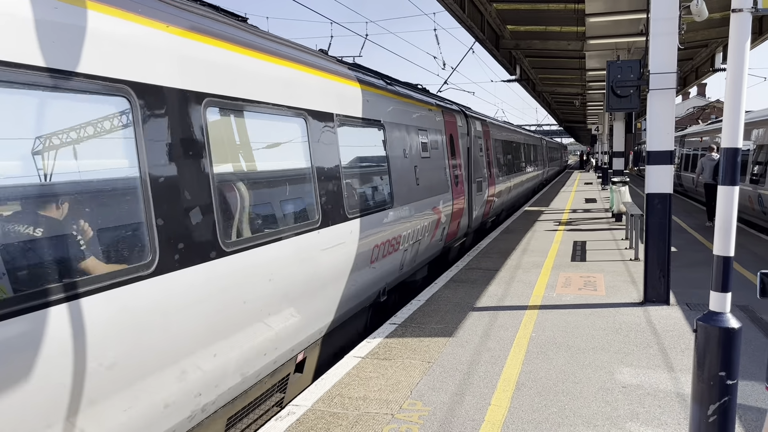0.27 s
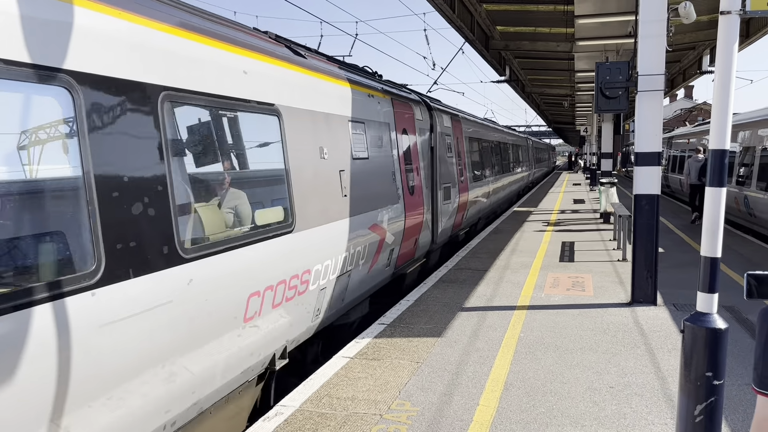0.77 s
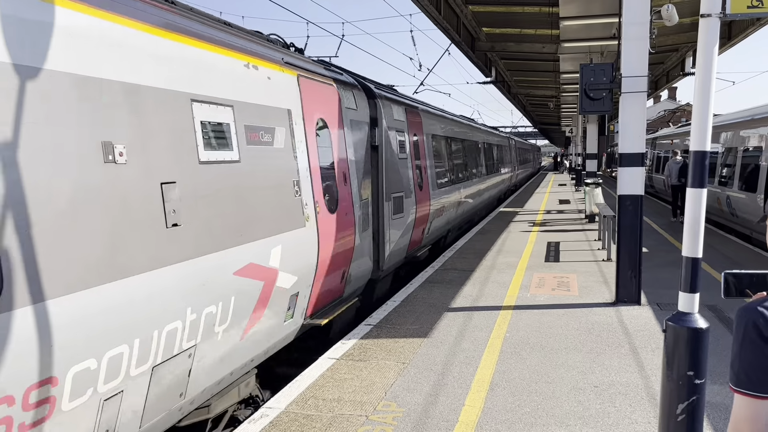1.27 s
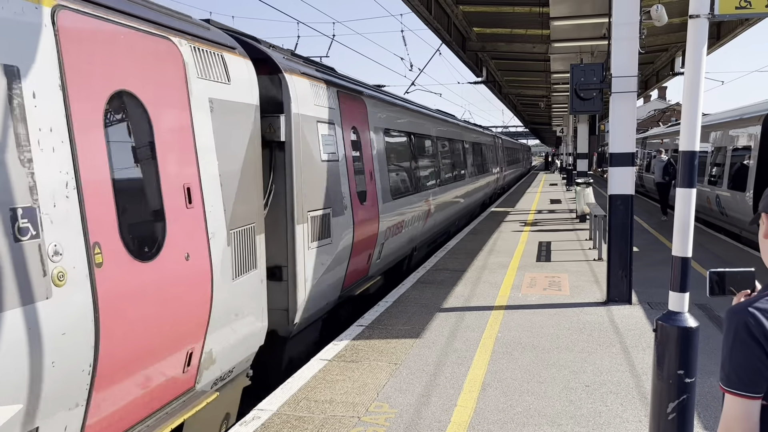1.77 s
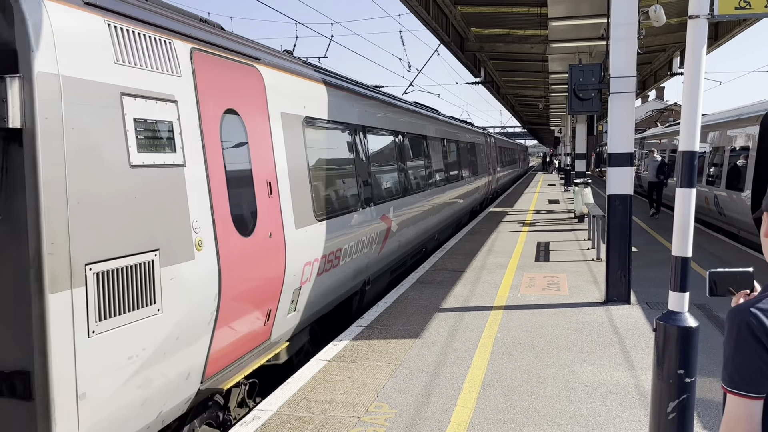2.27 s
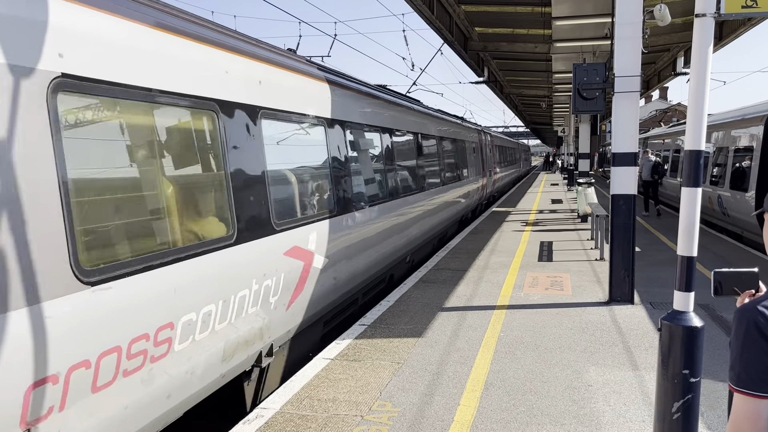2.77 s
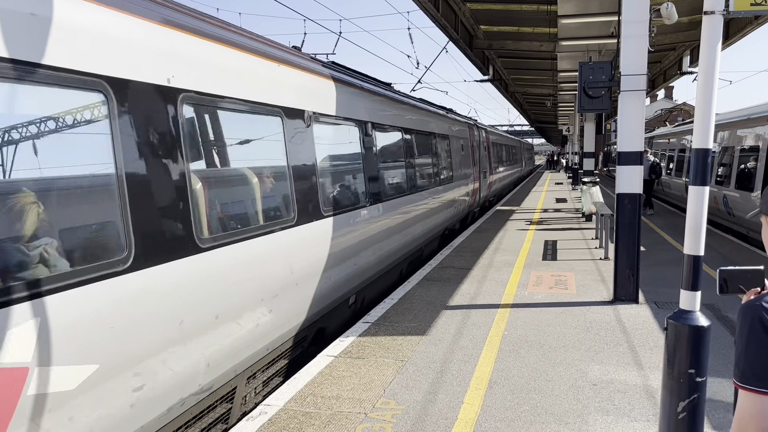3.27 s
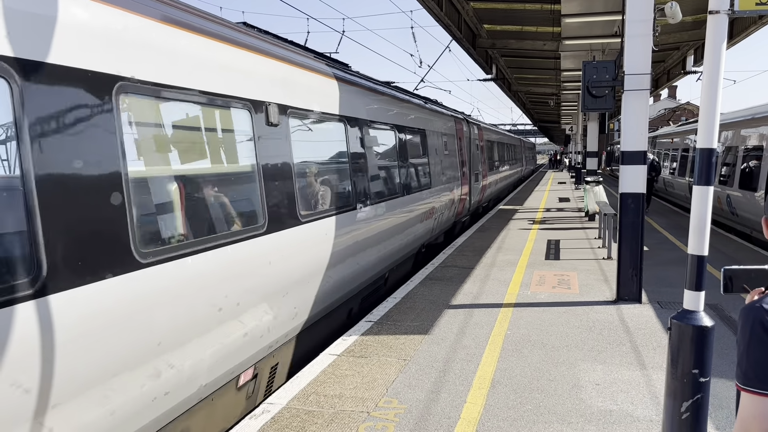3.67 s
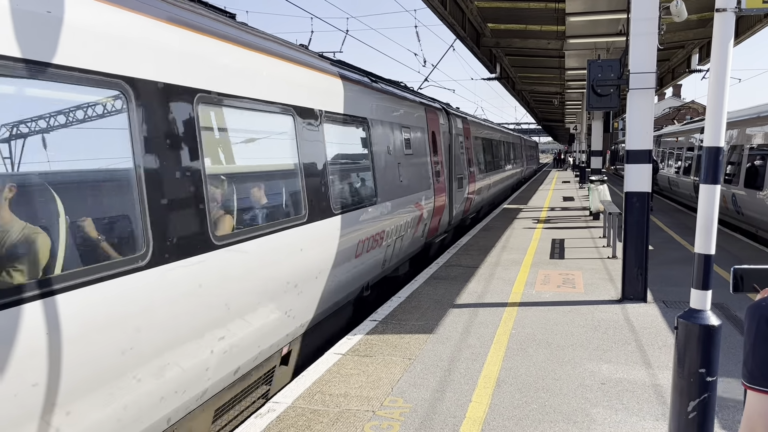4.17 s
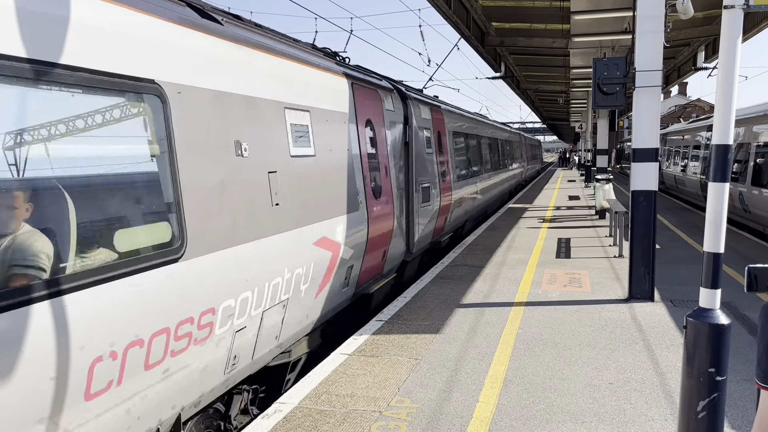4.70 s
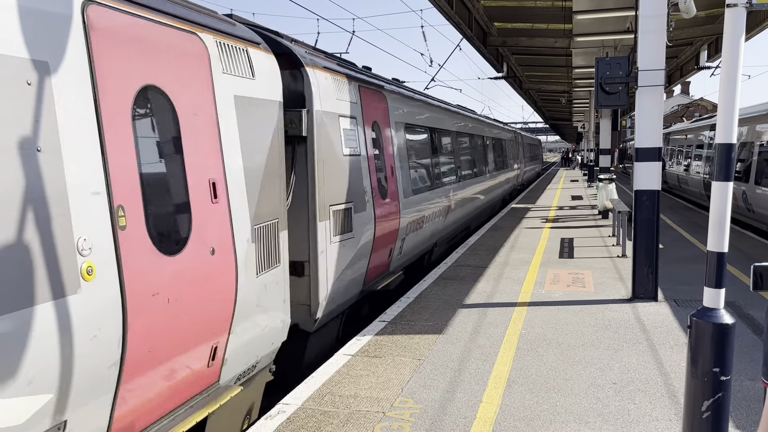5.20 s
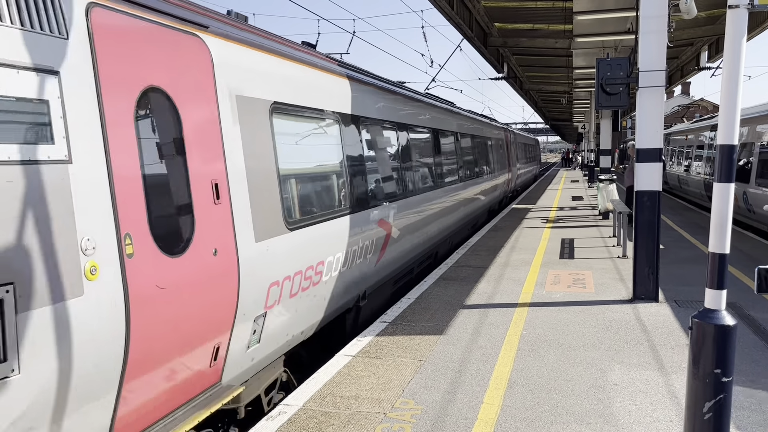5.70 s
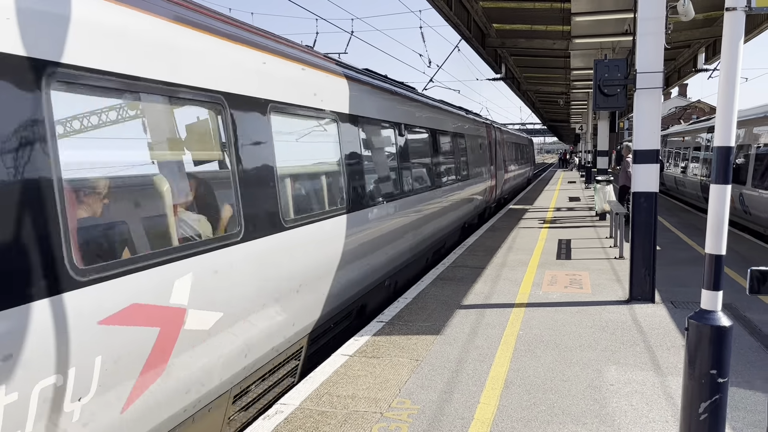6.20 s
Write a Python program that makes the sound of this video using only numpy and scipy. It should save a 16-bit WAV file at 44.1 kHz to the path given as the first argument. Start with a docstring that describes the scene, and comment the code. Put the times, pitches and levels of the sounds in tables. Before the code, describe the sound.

A diesel train pulls away close beside an open station platform. A strong low engine drone swells near the start, fades into a looser throb, then a second engine passes later with wheel roar, mechanical noise and hiss. Breathy turbo whistles climb, strongest in the second half, and a third engine approaches at the end. Fixed stereo microphone at the platform edge, train slightly left.

```python
"""Along a station platform a diesel multiple unit pulls away, its carriages passing close by.
Under the floors six-cylinder engines drone and throb, as sums of wavering tones locked to one crank angle.
Two of them go by and a third draws near, each with swells of wheel roar, casing noise and hiss in coloured noise.
Faint gear whines and broad rushes come and go; breathy turbocharger whistles, narrow noise bands, climb
as the boost builds. A distant engine beats underneath."""
import sys
import numpy as np
from scipy import signal
from scipy.fft import rfft, irfft, next_fast_len
from scipy.io import wavfile
from scipy.ndimage import uniform_filter1d, minimum_filter1d

SR = 44100
rng = np.random.default_rng(int(sys.argv[2]) if len(sys.argv) > 2 else 0)


def store_wav(level_fs):
    """Save 16-bit WAV to argv[1]."""
    pcm = np.round(np.clip(np.atleast_2d(level_fs), -1, 1) * 32767)
    wavfile.write(sys.argv[1], SR, pcm.T.astype(np.int16))


N = 284445
TIME = np.arange(N) / SR

# engine speed, opening up and easing off: [t/s, crank speed/(turns per s)]
CRANK = [(0, 27.5), (1.5, 28.2), (2.25, 28.5), (2.6, 29.35), (2.85, 30.6), (4, 31.1), (5, 30.95),
         (5.8, 29.9), (6.1, 30), (6.45, 29.3)]

# exhausts going by: [t nearest/s, level of firing tone/dB, of its 2nd, 3rd and 4th harmonic/dB]
EXHAUSTS = [(1.0, -14, -9.5, -16, -33), (5.099, -23, -19.5, -31.5, -51)]
# swell of each of those four tones, first to fourth: [t after the pipe is nearest/s, half duration/s, far level/dB]
DRONE_SWELLS = [(-0.64, 1, -29), (-0.029, 0.78, -54.5), (0.13, 0.91, -58.5), (-.1, 0.44, -64)]
# a tone sinks as its echo from the platform cancels it: [t/s, half duration/s, harmonic, depth/dB]
FADES = [(0.094, 0.084, 3, 17), (0.293, 0.093, 2, 18.5), (0.749, 0.19, 2, 14), (1.419, 0.086, 3, 16.5),
         (1.504, 0.09, 1, 6.5), (2.394, 0.33, 1, 14.5), (2.35, .1, 3, 21), (2.952, .12, 2, 30),
         (3.244, 0.27, 1, 14), (3.468, 0.16, 2, 42), (3.3, 0.54, 3, 19), (3.845, 0.39, 1, 7.5),
         (4.32, 0.083, 2, 25), (4.645, 0.23, 1, 13.5), (5.757, .18, 1, 14), (6.35, .25, 2, 4)]
# swells of the throb of unequal cylinders: [t strongest/s, level of deep part/dB, level of upper part/dB]
THROBS = [(.15, -38.5, -35.5), (.9, -55.5, -27.5), (1.7, -29.5, -36.5), (2.45, -37, -33),
          (3.45, -38.5, -58), (4.699, -42, -26.5), (5.17, -24, -31)]
# shape of the deep and the upper swell: [t after that moment/s, half duration/s, far level/dB]
DEEP_SWELL = (0.0, 0.28, -41.5)
UPPER_SWELL = (0.0, 0.26, -35)
# crank orders in the deep and the upper throb: [multiple of crank speed, level/dB]
DEEP_ORDERS = [(4, -4), (4.5, -9), (5, 2.5), (5.5, -13)]
UPPER_ORDERS = [(6.5, -28), (7, -1), (7.5, -23), (8, -0.5), (8.5, -10.5), (10, -15)]
# colour of the turbulent gas, common to both sides: [f/Hz, relative level per Hz/dB]
GAS_MID = [(32, -24), (45, -6.5), (70, -0.5), (110, -10.5), (160, -4.5), (220, 4), (280, -6), (340, -10.5),
           (420, -25)]

# underfloor machinery going by: [t abreast/s, level of wheel roar/dB, of engine casing/dB, of air hiss/dB]
MACHINERY = [(.53, -27, -40, -51.5), (4.42, -29, -44, -53.3), (6.45, -35, -44.5, -53)]
# how roar, casing and hiss swell: [t after the machinery is abreast/s, half duration/s, far level/dB]
ROAR_SWELL = (0.11, 0.83, -48)
CASING_SWELL = (-.03, 0.91, -56.5)
HISS_SWELL = (0.0, 0.61, -90.5)
# colour of the wheels' roar: [f/Hz, relative level per Hz/dB]
ROAR = [(200, 3.5), (300, 4), (360, -1.5), (420, 0), (500, -0.5), (630, -5.5), (800, -5.5), (1000, -9),
        (1300, -10.5), (1600, -24), (2200, -23.5)]
# crank orders radiated by the block: [multiple of crank speed, level against the roar/dB]
BLOCK_ORDERS = [(11, -20.5), (12, -14), (13, -14.5), (15, -15.5), (16, -16.5), (18, -17), (19, -18)]
# slow shaking of the block: [multiple of crank speed, level against the roar at mean speed/dB]
SHAKE_ORDERS = [(1.5, -14), (2, -13.5), (2.5, -22.5)]
# casing and hiss colours, MID common to both sides, SIDE opposed: [f/Hz, relative level per Hz/dB]
CASING_MID = [(1000, -0.5), (1500, 0), (1750, 4.5), (2100, 0), (2500, -0.5), (3000, 0), (4000, -5),
              (5400, -10.5), (7200, -12.5), (8300, -41), (14000, -29.5)]
CASING_SIDE = [(1000, -10), (1500, 8.5), (2100, -3), (3000, -2.5), (4000, -9), (5400, -8.5), (7000, -16),
               (9000, -31.5), (14000, -43.5)]
HISS_MID = [(4000, 0), (7000, -4), (8300, -25), (9300, 7), (11000, 6), (12500, 5.5), (14500, -2.5)]
HISS_SIDE = [(4000, -7.5), (7000, 4.5), (8800, 15), (10000, 6), (11500, -16), (14500, 6)]
# ringing of the casing: [f/Hz, width/Hz, level against the casing noise/dB]
CASING_RING = (1730, 45, -10.5)

# broad rush of passing bogies and vents: [t nearest/s, half duration/s, f/Hz, spread either side/Hz, level/dB]
RUSHES = [(0.0, 0.24, 1150, 297, -38), (.31, .6, 2023, 225, -46), (.9, .45, 820, 79, -44.5),
          (.95, 0.33, 3042, 215, -43.5), (1.1, 0.45, 5700, 347, -53), (3.25, 0.91, 1206, 202.5, -46),
          (3.85, 0.69, 2403, 401, -46), (4.65, 0.27, 3113, 347.7, -44), (4.55, 0.38, 330, 34.8, -35),
          (5.8, 1, 5105, 1012, -49.5), (6.45, 0.54, 1300, 198, -45.5)]
# whines of gears and pumps: [t nearest/s, half duration/s, f/Hz, spread either side/Hz, level/dB]
WHINES = [(.4, .6, 1163, 8, -49), (1.5, .25, 1170, 14, -53), (.3, .35, 2331, 9, -48.5),
          (.8, .5, 2712, 4, -50.5), (1.6, .6, 5440, 40, -64.5), (3.25, .15, 1945, 8, -54),
          (4.41, .08, 1290, 6, -41), (4.6, .7, 1292, 12, -51), (4.3, .65, 1735, 20, -47.5),
          (5.0, .5, 2745, 14, -54.5), (6.05, .2, 2730, 14, -51)]
# turbocharger whistles: [t nearest/s, half duration/s, f then/Hz, climb/(Hz per s), spread either side/Hz,
#                         level/dB, level of the part common to both sides against the opposed core/dB]
WHISTLES = [(0.596, 0.46, 8930, 0.5, 600, -55, -24), (1.398, 0.91, 6000, 289.5, 120, -63, 2),
            (4.377, 0.74, 7590, 310, 110, -44.5, -5), (5.19, 0.68, 7860, 330.5, 118.3, -46.5, -21.5),
            (6.403, 0.27, 8600, 354.5, 150, -36, -19.5)]
# an engine further down the train: [multiple of crank speed, level/dB]
FAR_ORDERS = [(3, -34), (4, -39), (6, -33.5), (9, -36)]

THROB_ANGLE = np.pi / 20  # the strongest cylinder's thump trails the firing pulse, radians of crank
SILENCER_TOP_HZ = 274
PIPE_HZ, PIPE_WIDTH_HZ = 190, 130
GAS_DB, GAS_FOLLOWS = -10, 0.61  # gas level at unit throb gain; share of the throb's swing in dB
EXHAUST_LAG_S, ROAR_LAG_S = 0.00033, 0.00034  # both reach the left side first
ROAR_SCATTER_DB = -5  # scattered part of the roar, opposed between the sides
SHAKE_DB_PER_TURN_PER_S = 2.3  # the block shakes harder at speed
WHISTLE_SKIRT_DB = -9
FAR_TURNS_PER_S, FAR_WANDER_PER_S = 30.9, 0.25
CUTOFF_HZ = 14600


def exhaust(crank):
    """The drone and the throb leave through the pipe, with puffs of gas that grow with the throb."""
    times, deep_db, upper_db = np.transpose(THROBS)
    deep_gain = going_by(times, deep_db, DEEP_SWELL)
    upper_gain = going_by(times, upper_db, UPPER_SWELL)
    tones = pipe(drone(crank) + throb(crank, deep_gain, upper_gain))
    return from_left([tones, tones], EXHAUST_LAG_S) + gas_puffs(crank, upper_gain)


def drone(crank):
    """Three firings a turn give a tone and its overtones, each swelling as a pipe goes by."""
    times, *levels_db = np.transpose(EXHAUSTS)
    total = np.zeros(N)
    for harmonic, (tone_db, swell) in enumerate(zip(levels_db, DRONE_SWELLS), 1):
        gain = going_by(times, tone_db, swell) * fading(harmonic)
        total += gain * partial(crank, 3 * harmonic, waver=.15)
    return total


def fading(harmonic):
    """Gain of one exhaust tone: it sinks into a trough wherever its platform echo cancels it."""
    loss_db = np.zeros(N)
    for trough_s, half_s, which, depth_db in FADES:
        if which == harmonic:
            loss_db += depth_db * np.exp(-np.abs((TIME - trough_s) / half_s) ** 3)
    return from_db(-loss_db)


def throb(crank, deep_gain, upper_gain):
    """Unequal cylinders add a loose thump; the silencer rolls off the top of its upper part."""
    late_crank = crank - THROB_ANGLE
    silencer = signal.butter(8, SILENCER_TOP_HZ, fs=SR, output="sos")
    deep = orders_of(late_crank, DEEP_ORDERS)
    upper = signal.sosfiltfilt(silencer, orders_of(late_crank, UPPER_ORDERS))
    return deep_gain * deep + upper_gain * upper


def pipe(x):
    """The exhaust pipe delays the tones near its resonance, so each thump rings a few cycles."""
    r = np.exp(-np.pi * PIPE_WIDTH_HZ / SR)
    poles = [1, -2 * r * np.cos(2 * np.pi * PIPE_HZ / SR), r * r]
    return signal.lfilter(poles[::-1], poles, x)  # all-pass: levels stay, phase turns


def gas_puffs(crank, upper_gain):
    """Turbulent gas is low coloured noise, puffing once a turn and following the upper throb."""
    gas_side = [(100, -25.0), (200, -2), (300, -21.0), (500, -23)]  # f/Hz, relative level per Hz/dB
    gas = wide_noise(GAS_MID, gas_side, left_db=2.0, patchy_db=0.5)
    puffs = 1 + 0.31 * np.cos(crank)
    return from_db(GAS_DB) * upper_gain ** GAS_FOLLOWS * puffs * gas


def running_gear(crank, turns):
    """Roar and casing noise pulse slightly with the engine; the air hiss stays free of that beat."""
    times, roar_db, casing_db, hiss_db = np.transpose(MACHINERY)
    firing = np.cos(3 * crank)
    beat = 1 + 0.03 * firing + 0.011 * np.cos(crank) + 0.038 * np.cos(crank / 2)
    roar = going_by(times, roar_db, ROAR_SWELL) * wheels_and_block(crank, turns)
    casing = going_by(times, casing_db, CASING_SWELL) * engine_casing()
    hiss = going_by(times, hiss_db, HISS_SWELL) * cooling_air()
    return (roar + casing) * beat + hiss


def wheels_and_block(crank, turns):
    """Wheels roar on the rail as coloured noise; the block growls and shakes at crank orders."""
    scattered = [(hz, db + ROAR_SCATTER_DB) for hz, db in ROAR]
    rolling = wide_noise(ROAR, scattered, left_db=2.0, patchy_db=1.0)
    speed_gain = from_db(SHAKE_DB_PER_TURN_PER_S * (turns - turns.mean()))
    shake = speed_gain * orders_of(crank, SHAKE_ORDERS)
    block = orders_of(crank, BLOCK_ORDERS) + shake
    return from_left(rolling + block, ROAR_LAG_S)


def engine_casing():
    """The casing radiates mid-range noise with one narrow ring in it."""
    ring_hz, ring_width_hz, ring_db = CASING_RING
    ring = from_db(ring_db) * narrow_noise(ring_hz, ring_width_hz / 2)
    return wide_noise(CASING_MID, CASING_SIDE, left_db=1.0, patchy_db=0.95) + ring


def cooling_air():
    """Cooling air hisses as high coloured noise."""
    return wide_noise(HISS_MID, HISS_SIDE, left_db=0, patchy_db=.5)


def passers(rows):
    """Each source rises and falls as it goes by slightly left, partly direct and partly scattered."""
    out = np.zeros((2, N))
    for nearest_s, half_s, hz, spread_hz, level_db in rows:
        jittery_hz = hz + spread_hz * drift(spread_hz)
        direct = np.sqrt(2) * np.cos(angle_of(jittery_hz))
        scattered = np.array([narrow_noise(hz, spread_hz) for side in range(2)])
        out += from_db(level_db) * nearness(nearest_s, half_s) * (.8 * direct + .6 * scattered)
    return out * from_db([[.8], [-.8]])


def turbo():
    """Each whistle is narrow noise on a climbing pitch in a wider skirt of air, mostly opposed in stereo."""
    out = np.zeros((2, N))
    for nearest_s, half_s, pitch_hz, climb, spread_hz, level_db, common_db in WHISTLES:
        hz = pitch_hz + climb * (TIME - nearest_s)
        skirt = from_db(WHISTLE_SKIRT_DB) * narrow_noise(hz, 2 * spread_hz)
        side = narrow_noise(hz, spread_hz) + skirt
        mid = from_db(common_db) * narrow_noise(hz, spread_hz)
        out += from_db(level_db) * nearness(nearest_s, half_s) * np.array([mid + side, mid - side])
    return out


def far_engine():
    """A distant engine, already at its own wandering speed, beats against the near one."""
    turns = FAR_TURNS_PER_S + FAR_WANDER_PER_S * drift(0.5153)
    return orders_of(angle_of(turns), FAR_ORDERS)


def orders_of(crank, orders):
    """Whole and half crank orders add up to a loose thump."""
    return sum(from_db(db) * partial(crank, multiple, waver=.4) for multiple, db in orders)


def partial(crank, multiple, waver):
    """One crank order; uneven combustion shakes its height and, more slowly, its phase."""
    height = 1 + .5 * waver * drift(10.4)
    return np.sqrt(2) * height * np.cos(multiple * crank + waver * drift(3.86))


def going_by(times, levels_db, swell):
    """Gain of sources that pass one after another, over the sound of the rest of the train."""
    late_s, half_s, far_db = swell
    passes = sum(from_db(db) * nearness(s + late_s, half_s) for s, db in zip(times, levels_db))
    return from_db(far_db) + passes


def nearness(nearest_s, half_s):
    """Gain of a source screened by the platform edge until close; half height at half_s either side."""
    return 1 / (1 + ((TIME - nearest_s) / half_s) ** 2)


def from_left(pair, lag_s):
    """The right side hears a source on the left a little later."""
    return np.array([pair[0], np.interp(TIME - lag_s, TIME, pair[1])])


def wide_noise(mid_colour, side_colour, left_db, patchy_db):
    """Fluttering stereo noise; its common part has rms 1 before the lean to one side."""
    mid, side = [coloured(c) * from_db(patchy_db * drift(13)) for c in (mid_colour, side_colour)]
    lean = from_db([[left_db / 2], [-left_db / 2]])
    return np.array([mid + side, mid - side]) / np.std(mid) * lean


def coloured(spectrum):
    """White noise shaped in the frequency domain to the given colour."""
    size = next_fast_len(N)
    hz = np.maximum(np.arange(size // 2 + 1) * SR / size, 1)
    white = rfft(rng.standard_normal(size))
    return irfft(white * from_db(at_hz(spectrum, hz)), size)[:N]


def at_hz(points, hz):
    """Read a spectrum in dB on a log-frequency axis; practically silent beyond its ends."""
    known_hz, level_db = np.transpose(points)
    return np.interp(np.log(hz), np.log(known_hz), level_db, left=-120, right=-120)


def narrow_noise(hz, spread_hz):
    """A breathy tone of rms 1: two slow drifts ride a cosine and a sine at a steady or moving pitch."""
    angle = angle_of(hz)
    return drift(spread_hz) * np.cos(angle) + drift(spread_hz) * np.sin(angle)


def angle_of(hz):
    """Running phase of a frequency curve."""
    return 2 * np.pi * np.cumsum(hz * np.ones(N)) / SR


def drift(rate_hz):
    """Random wander of spread 1: noise at a twentieth of the rate through two equal low-pass poles."""
    r = np.exp(-40 * np.pi * rate_hz / SR)
    noise = rng.standard_normal(N // 20 + 4002)
    slow = signal.lfilter([1], [1, -2 * r, r * r], noise)[4000:]  # skip the filter's start-up
    return np.interp(np.arange(N) / 20, np.arange(len(slow)), rms_one(slow))


def rms_one(x):
    """Scale to rms 1."""
    return x / np.sqrt(np.mean(x ** 2) + 1e-20)


def from_db(db):
    """Decibels to gain."""
    return 10 ** (np.asarray(db) / 20)


def scene():
    """One crank angle ties the drone, the throb, the gas puffs, the block and the pulse of roar and casing
    together; the rushes, whines, whistles and the distant engine run free."""
    turns = np.interp(TIME, *np.transpose(CRANK))
    crank = angle_of(turns)
    near_train = exhaust(crank) + running_gear(crank, turns)
    return near_train + passers(RUSHES) + passers(WHINES) + turbo() + far_engine()


def record(dry):
    """A limiter holds the highest peaks, the ends are eased, and the deepest bass and the top are cut."""
    allowed = np.minimum(1, .93 / (np.abs(dry).max(axis=0) + 1e-9))
    gain = uniform_filter1d(minimum_filter1d(allowed, size=1201), size=1201)
    ease = np.minimum(1, np.minimum(TIME, TIME[::-1]) / .003)
    bass_cut = signal.butter(1, 15, "high", fs=SR, output="sos")
    top_cut = signal.ellip(10, .1, 80, CUTOFF_HZ, fs=SR, output="sos")
    return signal.sosfilt(top_cut, signal.sosfilt(bass_cut, ease * gain * dry))


dry = scene()
out = record(dry)
store_wav(out)
```